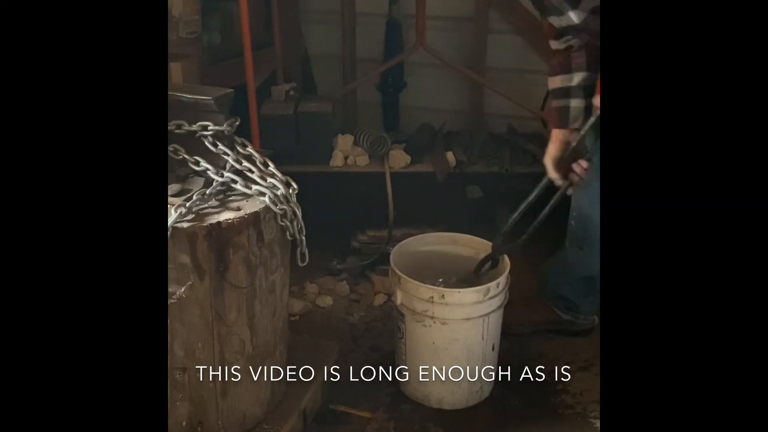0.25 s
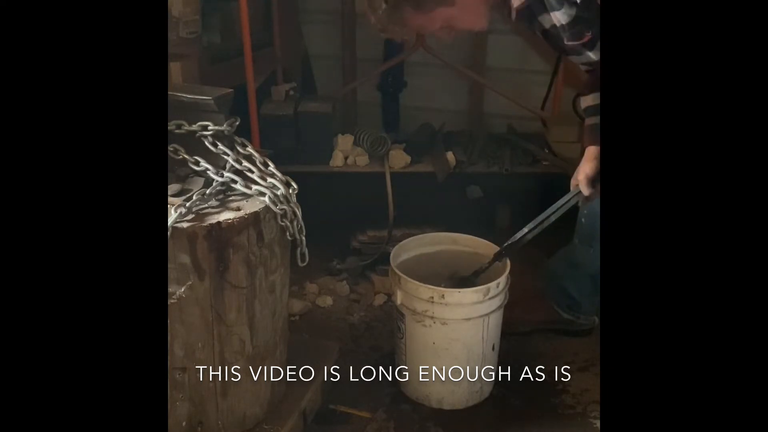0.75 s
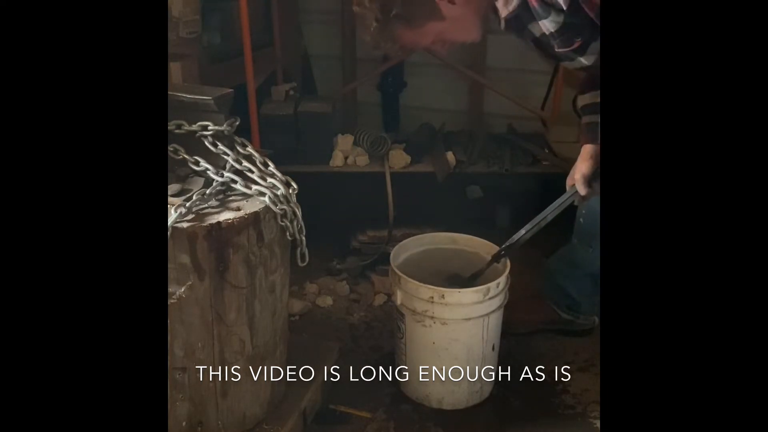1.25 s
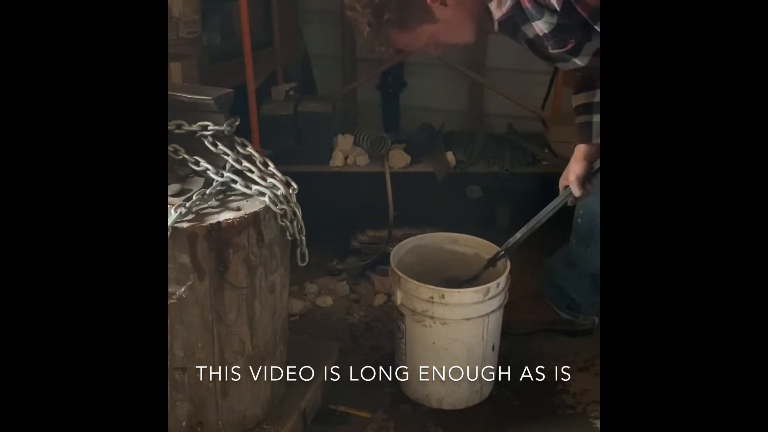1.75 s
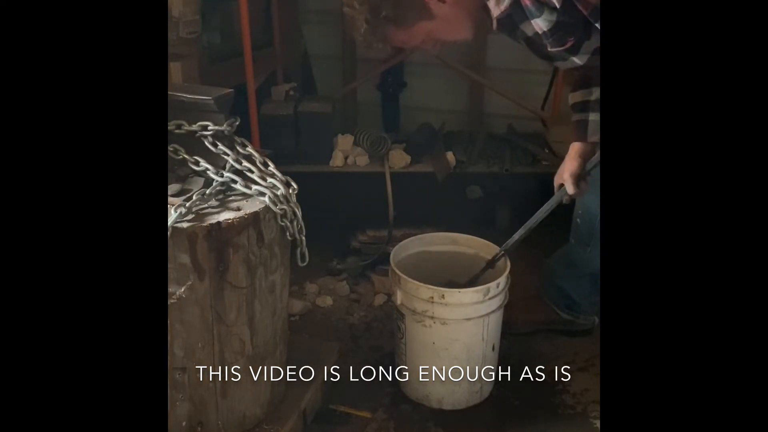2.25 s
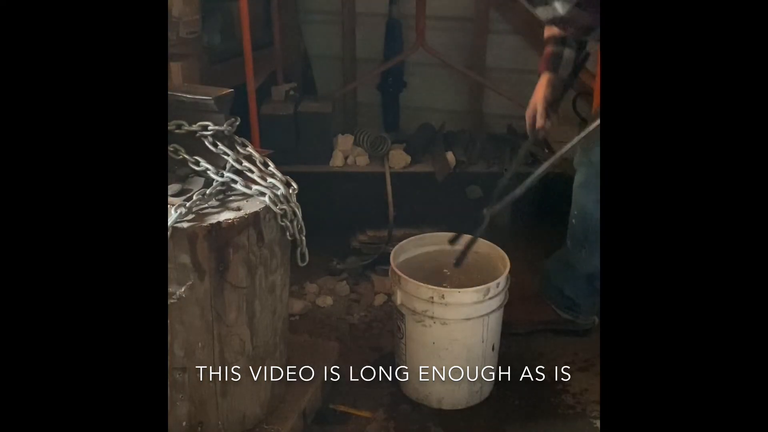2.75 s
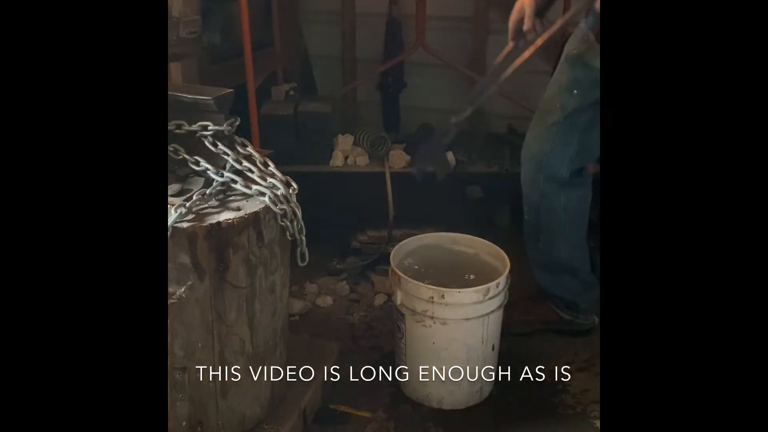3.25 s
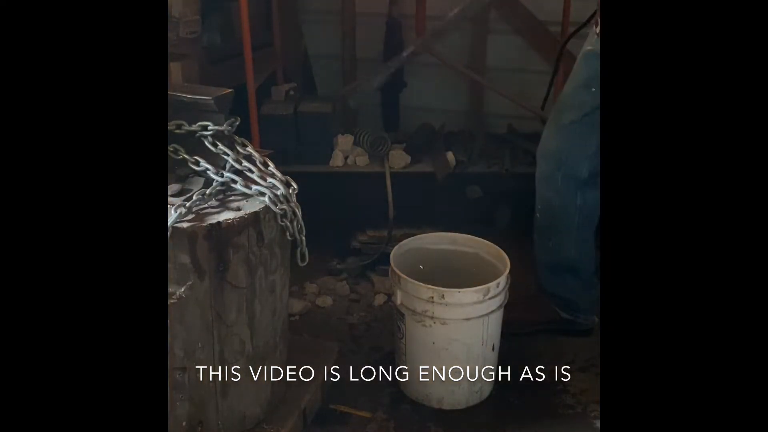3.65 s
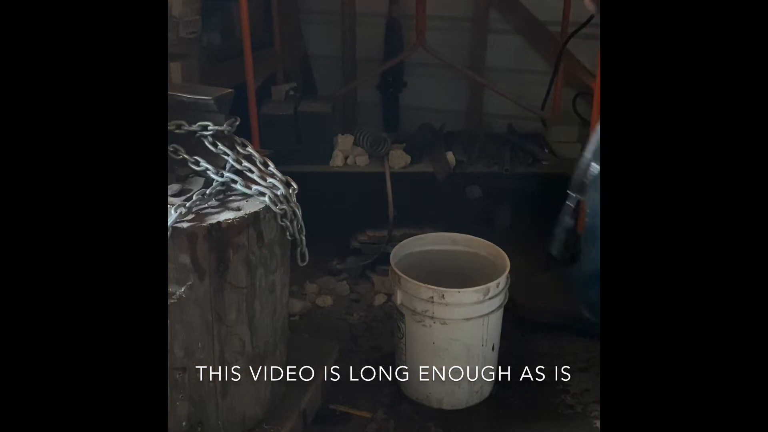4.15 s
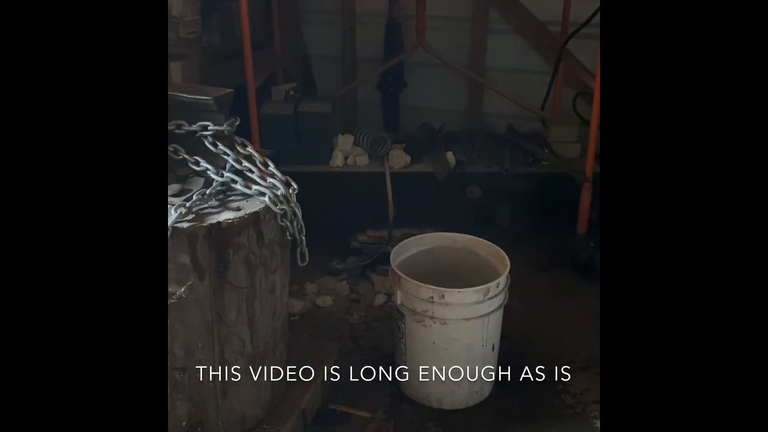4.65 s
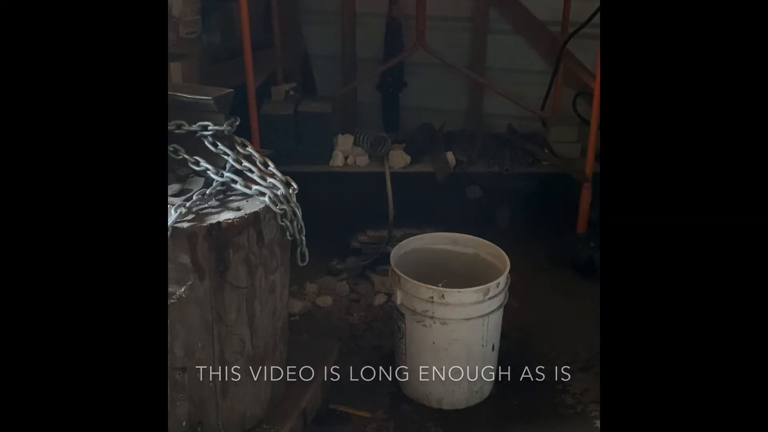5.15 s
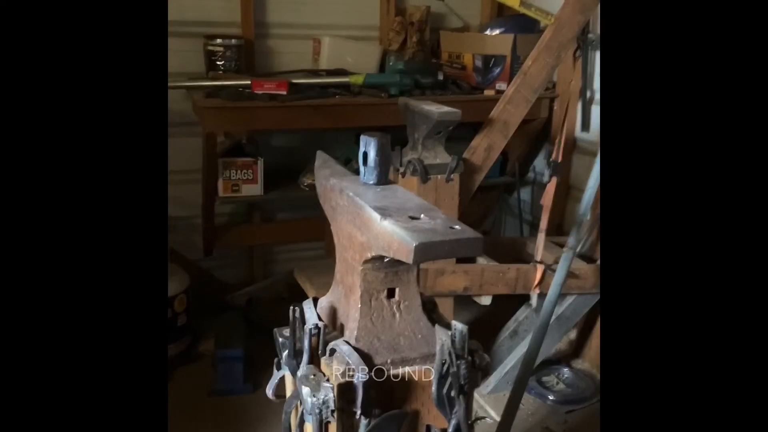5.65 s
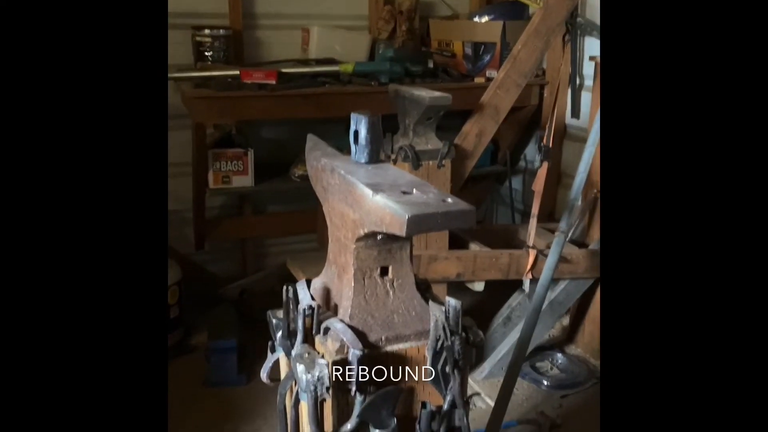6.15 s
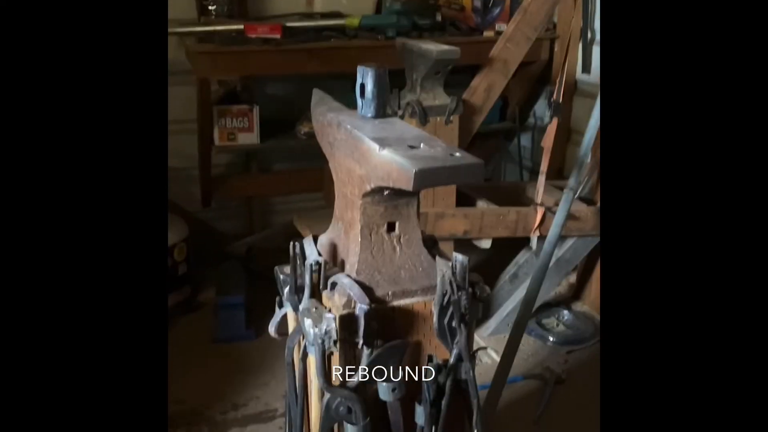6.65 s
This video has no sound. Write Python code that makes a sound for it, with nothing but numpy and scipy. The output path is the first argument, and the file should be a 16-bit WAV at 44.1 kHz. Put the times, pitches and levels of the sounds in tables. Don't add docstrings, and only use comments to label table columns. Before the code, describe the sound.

A steady, hollow burner roar fills a small shed with short echoes. An early light contact, then a loud plastic bucket knock, quick steel clatter, scrapes and wobbling slaps on boards. After a dull thud, a water drop fizzes on hot metal with a faint ring. The roar sags and stops; in sudden quiet, a hand shifts on the camera, bumping and clicking close to stereo microphones.

```python
import sys
import numpy as np
from scipy import signal
from scipy.fft import rfft, irfft
from scipy.io import wavfile
from scipy.ndimage import uniform_filter1d

SR = 44100
rng = np.random.default_rng(int(sys.argv[2]) if len(sys.argv) > 2 else 0)


def materialize(psi):
    bounded = np.clip(np.atleast_2d(psi).T, -1, 1)
    quanta = np.round(bounded * 32767).astype(np.int16)
    wavfile.write(sys.argv[1], SR, quanta)


def how_loud(loudness_db):
    steps = np.asarray(loudness_db, float) / 20
    return 10 ** steps


N = 303828

CHANGE_S = 5.436
KNOCK_S, KNOCK_DB = 2.6445, -7
SPIT_S = 3.661
PORT_DELAY_S = 7 / SR

# frequency in Hz, density in dB per Hz.
ROAR = [(36, -4), (80, -6), (150, -2.5), (230, -6), (450, -4), (720, -4.5), (850, -12.5), (1400, -16.5),
        (2700, -15.5), (3300, -20.5), (4300, -29), (5600, -30.5), (8000, -36.5), (16000, -36.5)]
# frequency in Hz, width in Hz, level in dB.
STANDING_WAVES = [(57, 15, 6), (152.7, 27, 4.8), (268.1, 24, 14.11), (305.3, 27, 6), (378.14, 9.5, 22.19),
                  (494.6, 7, 13.4), (633.4, 46, 14.45), (689, 14, 12), (784, 16, 2.6), (915, 52, 12.22),
                  (1023.3, 60, 13.57), (1320, 100, 6.6), (1800, 23, 6.3), (2140, 81, 7), (2830, 150, 5),
                  (4960, 360, 6.1), (9390, 780, 6.6), (11910, 700, 10), (15760, 400, 5)]
# start in seconds, peak in dB, ring frequency in Hz,
# broad crack in dB, crack t60 in seconds.
SHOP_TICKS = [(0.1426, -19.5, 1203, -6.5, 0.0134), (0.146, -26.5, 2010, -9.5, 0.0147),
              (2.6859, -19.5, 1480, 6, 0.0131), (2.7846, -40.5, 1430, -8, .02),
              (2.8255, -28, 1240, 5.5, 0.014), (2.862, -20, 1492, -1, 0.0233),
              (2.879, -22, 2064, -2.5, .02), (2.8889, -26, 2025, 2, .032), (2.905, -24.5, 2126, -6.5, .02),
              (2.9516, -20.5, 2015, 2, .02), (2.9845, -18.5, 2026, 4, 0.0177),
              (3.007, -28.5, 1804, 8.5, 0.018), (3.0697, -31.5, 1525, -1.5, .02),
              (3.0939, -22, 2185, 3, 0.025), (3.102, -27.5, 1730, -8, 0.0187), (3.133, -29.5, 1423, 1, .02),
              (3.143, -27, 1430, -1.5, 0.016), (3.61, -30, 2236, -3, 0.029), (3.618, -30, 2304, -6, 0.022)]
# start in seconds, scrape in dB, hiss in dB, t60 in seconds.
SKIDS = [(0.143, -30.5, -51.5, 0.248), (2.688, -29.5, -44.5, 0.32), (2.827, -31.5, -51, 0.114),
         (2.862, -30.5, -46, 0.28), (2.89, -43.5, -55, .2), (2.955, -38, -44, 0.147),
         (2.984, -30, -46, 0.18), (3.094, -28, -44.5, 0.17), (3.14, -36.5, -56.5, 0.314),
         (3.562, -46, -53.5, .15), (3.614, -54, -50.5, 0.15)]
# loudest moment in seconds, scrape in dB, hiss in dB,
# 60 dB rise in seconds, t60 in seconds.
BRUSH = [
    (2.478, -51, -48.5, 0.02, .25),
]
# loudest moment in seconds, level in dB,
# 60 dB rise in seconds, t60 in seconds.
ROCKS = [
    (.168, -33.5, 0.04, 0.246),
    (2.725, -35.5, -0.48, 0.89),
    (2.89, -32.5, 0.36, 0.36),
    (3.0, -35, 0.51, .5),
    (3.16, -35, 0.75, 0.186),
    (3.25, -43, 0.52, 0.83),
    (4.55, -36, 0.0155, 0.466),
    (4.71, -57.5, 0.3, 0.143),
]
# frequency in Hz, width in Hz, level in dB.
WALL_MODES = [(120, 11, 2.5), (180.3, 30, 0.5), (265.1, 25, -3), (392, 50, -10.5)]
# frequency in Hz, width in Hz, level in dB.
TONGS_MODES = [(641, 220, 1.5), (990, 330, -1), (1531, 180, -1), (2007, 190, -0.5), (2856, 440, -6.5)]
# frequency in Hz, density in dB per Hz.
GRIT_HISS = [(3000, -18.5), (4000, -3), (5000, 0), (6500, -3), (9000, -12.5), (12000, -15.5),
             (16000, -33.5)]
# start in seconds, peak in dB, frequency in Hz, rise in seconds, t60 in seconds.
SHOP_THUDS = [
    (.154, -26.5, 200.7, 0.0046, 0.118),
    (.158, -26.5, 109.8, 0.0049, 0.0475),
    (.21, -33, 85.6, 0.0095, 0.113),
    (3.5635, -21, 135, 0.0026, 0.18),
    (3.612, -23, 170, 0.00385, 0.037),
]
# start in seconds, peak in dB, frequency in Hz,
# rise in seconds, t60 in seconds.
SLAPS = [(2.672, -14, 300, 0.0039, .03), (2.702, -15.5, 289, 0.0042, .03),
         (2.872, -27.5, 270.7, 0.0064, .07), (2.902, -23.5, 127.7, 0.0055, .08),
         (2.905, -26, 197, 0.009, .07), (2.94, -27, 122, .01, .07), (2.988, -28.5, 121, 0.0062, 0.074),
         (2.992, -27, 255, .008, 0.051), (3.028, -25, 160, 0.0049, 0.045), (3.092, -31, 139.8, 0.0081, .08),
         (3.132, -27.5, 150.5, 0.0081, .06), (3.165, -28, 174.2, 0.011, .08), (3.17, -32, 105, 0.0114, .1),
         (3.27, -39, 144.5, 0.0125, 0.11)]
# frequency in Hz, t60 in seconds.
SHED_DECAY = [(60, 0.38), (200, 0.27), (600, 0.13), (2000, 0.2), (6000, 0.17), (16000, 0.032)]
# frequency in Hz, level in dB, t60 in seconds.
BUCKET_MODES = [(175.86, -3.5, 0.47), (277.6, 2.5, 0.078), (328.8, 4.5, 0.2105), (372.5, -8, 0.18),
                (663.9, -4.5, 0.22), (907, -14.5, 0.2), (1306, -18.5, 0.2), (1488, -10.5, 0.13),
                (1692, -24.5, 0.55), (1780, -22.5, 0.25), (1924, -21, .25), (2194, -23.5, 0.14),
                (2505, -34.5, 0.32), (2565, -39.5, 0.4),
                (120, -13.5, 0.55), (90, -13, 0.34), (731.8, -8.5, .22), (220, -18, 0.15),
                (430.6, -3.5, 0.16), (528.6, -7.5, 0.16), (594.8, -9.5, 0.12), (808.2, -9.5, 0.13),
                (1057, -13.5, 0.16)]
# frequency in Hz, density in dB per Hz.
STEAM_COLOUR = [(3000, -13), (4200, -3.5), (5000, -4), (7000, 0.5), (9300, -6.5), (10300, -9),
                (11000, -8.5), (13500, -8), (16000, -20.5)]
# frequency in Hz, level in dB, t60 in seconds.
BAR_MODES = [(4040, -54.5, .15), (4788, -46, .12), (5770, -55.5, .12), (6150, -52, .12), (9190, -44, .06),
             (10700, -48.5, .09), (11000, -49, .07)]
# moment in seconds, level in dB.
GRIP = [
    (5.44, -48),
    (5.64, -37.5),
    (5.738, -44.5),
    (5.992, -46.5),
    (6.282, -45),
    (6.402, -45),
    (6.654, -41.5),
    (6.782, -45.5),
    (6.89, -51),
]
# frequency in Hz, density in dB per Hz.
RUMBLE = [(15, -58.5), (25, -17.5), (48, -3.5), (119, -10), (237, -13), (259, -18), (517, -28), (900, -55),
          (1170, -99.5), (1980, -120)]
# frequency in Hz, density in dB per Hz.
RUSTLE = [(2500, -16.5), (3800, -3.5), (5000, -5), (6200, -5.5), (9000, -13), (11500, -30.5),
          (16000, -26.5)]
# loudest moment in seconds, #
# dull layer in dB, bright layer in dB, 60 dB rise in seconds, t60 in seconds.
SLIDES = [
    (5.612, -60.5, -70.5, -0.24, .3),
    (6.0, -100, -80, 1.35, 1.45),
    (6.2, -71.5, -85.5, 3.5, 0.11),
    (6.385, -68.5, -86.5, 0.2039, 0.35),
    (6.42, -66.5, -87, 0.13, .2),
    (6.458, -55, -74.5, 0.11, 0.2),
    (6.63, -58.5, -74, 0.0429, 0.45),
    (6.71, -64, -72.5, 0.35, 0.3),
]
# frequency in Hz, width in Hz, level in dB.
SHELL_MODES = [(520, 75.4, 1.5), (1480, 119.5, -1), (2466, 140, -4.5), (3046, 110, -11), (4540, 250, -13),
               (768, 140, 5), (1050, 138, 2.5)]
# start in seconds, peak in dB, ring frequency in Hz, broad crack in dB.
BODY_TICKS = [(5.5374, -50.5, 1490, -7), (5.5498, -37.5, 1450, -24.5), (5.5666, -38.5, 1430, -7.5),
              (5.5734, -25.5, 2664, -11.5), (5.5813, -38, 1320, -5), (5.5959, -42.5, 1550, 4),
              (5.6144, -41.5, 1420, 1.5), (6.2227, -33, 2343, -1), (6.2324, -40.5, 1300, 11),
              (6.2424, -45, 2600, 7), (6.327, -46.5, 1050, -4.5), (6.3405, -65.5, 1410, -12),
              (6.3882, -38, 1490, -8), (6.4024, -51.5, 1430, 0.5), (6.4213, -35.5, 1408, -5),
              (6.4474, -28.5, 1377, -7), (6.4527, -20, 2720, -4.5), (6.465, -24.5, 2554, -7.5),
              (6.4724, -36.5, 2490, 6), (6.4848, -52.5, 1350, -3.5), (6.6187, -49.5, 1960, -4),
              (6.7055, -49, 1770, -5.5)]
# start in seconds, peak in dB, frequency in Hz,
# rise in seconds, t60 in seconds.
BODY_THUMPS = [(5.553, -28, 130.7, .006, 0.075), (5.574, -21.5, 245, 0.00363, 0.0183),
               (5.576, -27, 520, 0.0027, 0.0795), (5.60, -37.5, 123, 0.005, 0.142),
               (5.82, -38.5, 120, 0.008, 0.12), (5.97, -42.5, 120, 0.011, 0.156),
               (6.224, -17.5, 240.9, 0.00208, 0.0264), (6.229, -14, 107.2, 0.00647, 0.068),
               (6.330, -46.5, 457, 0.00237, 0.026), (6.333, -36.5, 142.6, 0.006, 0.079),
               (6.422, -38, 407, 0.001985, 0.069), (6.459, -26, 455.4, 0.0053, 0.073),
               (6.462, -18.5, 90, 0.003, 0.1207), (6.525, -34, 170, 0.017, 0.052),
               (6.58, -41.5, 151.5, 0.0133, .15), (6.628, -32, 297, .004, 0.048),
               (6.636, -25.5, 179.2, 0.01, 0.1), (6.67, -30.5, 177.1, 0.0137, 0.047),
               (6.696, -23, 164.8, 0.0153, 0.104), (6.755, -37.5, 165.7, .014, 0.083),
               (6.785, -42, 393.5, .004, 0.043), (6.785, -29, 172.1, 0.0277, 0.041)]
# multiple of its frequency, level in dB.
BODY_PARTNERS = [(1.55, -19), (2.9, -28)]
# frequency in Hz, likeness from 0 to 1, lead of left in radians.
PORTS_SHOP = [(30, 1, 0), (80, .995, 0), (140, .97, -.15), (220, .93, -.3), (350, .82, -.5), (520, .5, -.6),
              (700, .25, 0), (900, .35, .6), (1700, .6, -.3), (2750, .87, .7), (4100, .65, 1.3),
              (4900, .5, .4), (5600, .8, .8), (6200, .85, 2.05), (7250, .96, 3.14)]
# frequency in Hz, likeness from 0 to 1, lead of left in radians.
PORTS_HAND = [(30, 1, 0), (80, .97, 0), (170, .85, 0), (450, .4, .8), (750, .4, 2.2), (1030, .6, 1.9),
              (1700, .7, 2.2), (2750, .88, 1.3), (3500, .3, 1), (5000, .25, 1.5), (6200, .85, 2.05),
              (7250, .95, 3.14)]
# frequency in Hz, left over right in dB.
PORT_TILT = [(60, 0.0), (150, -0.5), (380, -0.5), (950, 0.5), (2380, 0), (5980, -0.5), (15000, 0.0)]


def evened(x):
    return x / np.sqrt(np.mean(x ** 2) + 1e-20)


def read(points, hz, column=1):
    points = np.array(points)
    return np.interp(np.log(hz + 1), np.log(points[:, 0] + 1), points[:, column])


def level(rows, fade=0.01):
    rows, t = np.array(rows), np.arange(N) / SR
    edge = np.clip(np.minimum(t - rows[0, 0], rows[-1, 0] - t) / fade, 0, 1)
    return how_loud(np.interp(t, *rows.T)) * edge


def add(mix, s, sound):
    part = mix[round(s * SR):][:len(sound)]
    part += sound[:len(part)]


def peaks(modes, hz):
    return np.sqrt(sum(how_loud(db) ** 2 / (1 + (2 * (hz - f) / w) ** 2) for f, w, db in modes))


def noise(shape, size, patchy_db, flicker_db):
    frames, hz = 4 * N // size + 5, np.fft.rfftfreq(size, 1 / SR)
    a, b, c, d, patches = rng.standard_normal((frames, len(hz), 5)).T
    patches = uniform_filter1d(patches, size=size // 100, axis=0)
    patches = evened(uniform_filter1d(patches, size=8, axis=1))
    flicker = evened(uniform_filter1d(rng.standard_normal(frames), size=3))
    drift = how_loud(patchy_db * patches + flicker_db * flicker)
    z = np.array([a + 1j * b, c + 1j * d]) * shape(hz)[:, None] * drift
    return evened(signal.istft(z, nperseg=size, noverlap=3 * size // 4)[1][:, :N])


def strokes(rows):
    out = np.zeros(N)
    for s, db, rise, t60 in rows:
        t = np.arange(-min(rise, s), t60, 1 / SR)
        add(out, s + t[0], how_loud(db - 60 * np.maximum(-t / rise, t / t60)))
    return out


def layered(rows, dull, bright):
    rows = np.array(rows)
    return dull * strokes(rows[:, [0, 1, 3, 4]]) + bright * strokes(rows[:, [0, 2, 3, 4]])


def burner():
    ripple = evened(uniform_filter1d(rng.standard_normal(2049), size=3))

    def colour(hz):
        ripple_db = 3.22 * ripple * np.clip(hz / 1100, 0, 1)
        return how_loud(read(ROAR, hz) + ripple_db) * np.hypot(1, peaks(STANDING_WAVES, hz))

    t = np.arange(N) / SR
    fade = np.clip((CHANGE_S - t) / 0.0336, 0, 1)
    sag_db = 8.5 * np.maximum(t - 5.13, 0)
    return noise(colour, size=4096, patchy_db=.5, flicker_db=.15) * how_loud(-38 - sag_db) * fade


def ticks(rows, width, body, body_db, dull):
    out, t = np.zeros(N), np.arange(2000) / SR
    rise = np.sin(np.pi / 2 * np.minimum(t / .0025, 1)) ** 2
    for (s, db, hz, crack_db, t60), grit in zip(rows, rng.standard_normal((len(rows), len(t)))):
        spot_db = 3 * grit
        modes = [(hz, width, 0)]
        modes += [(f, w, mode_db + body_db + g) for (f, w, mode_db), g in zip(body, spot_db)]
        ring = sum(np.sin(2 * np.pi * f * t) * np.exp(-np.pi * w * t) * how_loud(g_db) for f, w, g_db in modes)
        crack = signal.lfilter([1, -1], [1, -.75], grit) * how_loud(crack_db - 60 * t / t60)
        crack = signal.lfilter([(1 - dull) ** 2], [1, -2 * dull, dull ** 2], crack)
        add(out, s, how_loud(db) * (ring * rise + crack))
    return out


def drags():
    wall = noise(lambda hz: peaks(WALL_MODES, hz) ** 2, size=1024, patchy_db=-0.5, flicker_db=1.5)
    tongs = noise(lambda hz: peaks(TONGS_MODES, hz) ** 2, size=256, patchy_db=1.0, flicker_db=0.5)
    grit = noise(lambda hz: how_loud(read(GRIT_HISS, hz)), size=256, patchy_db=5.0, flicker_db=4.0)
    rise_s = 0.019
    skids = [(s, scrape_db, hiss_db, rise_s, t60) for s, scrape_db, hiss_db, t60 in SKIDS]
    return wall * strokes(ROCKS) + layered(skids + BRUSH, tongs, grit)


def thuds(rows, partners, sag):
    out, t = np.zeros(N), np.arange(SR // 2) / SR
    modes = [(0.9968, 0.0017)] + partners  # (multiple, dB)
    for s, db, hz, rise, t60 in rows:
        shape = np.sin(np.pi / 2 * np.minimum(t / rise, 1)) ** 2
        shape *= how_loud(db - 60 * (np.maximum(t - rise, 0) / t60) ** 0.99)
        turns = np.cumsum(hz * (1 + sag * np.exp(-t / 0.0066))) / SR
        add(out, s, shape * sum(how_loud(g_db) * np.sin(2 * np.pi * k * turns) for k, g_db in modes))
    return out


def shed(x):
    taps = np.zeros((2, SR))
    at = np.arange(200, SR - 20, 20) + rng.integers(0, 20, (2, (SR - 201) // 20))
    np.put_along_axis(taps, at, rng.choice([-1., 1.], at.shape), 1)
    hz, t, z = signal.stft(taps, SR, nperseg=512)
    decay = how_loud(-60 * t / read(SHED_DECAY, hz)[:, None])
    tail = signal.istft(z * decay, SR, nperseg=512)[1]
    return signal.fftconvolve(x[None], tail / np.linalg.norm(tail[0]), axes=1)[:, :N]


def knock():
    t = np.arange(SR) / SR
    out = ticks([(KNOCK_S, -14, 5100, 0, .03)], 500, TONGS_MODES, body_db=-12.0, dull=.48)
    modes = BUCKET_MODES
    for (hz, db, t60), chance in zip(modes, rng.random((len(modes), 2))):
        late = np.maximum(t - .085 / np.sqrt(hz), 0)
        twin_hz, twin_gain = hz * (1.05 + 0.06 * chance[0]), 0.32 + .5 * chance[1]
        pair = np.sin(2 * np.pi * hz * late) + twin_gain * np.sin(2 * np.pi * twin_hz * late)
        early_push = 1 + 1.4 * np.exp(-late / 0.026)
        decay = how_loud(KNOCK_DB - 12.5 + db - 60 * late / t60)
        add(out, KNOCK_S, pair * early_push * np.minimum(late * hz * 2.0, 1) * decay)
    sweep_hz = 300 + 2300 * np.exp(-(t / .0055) ** 2.2)
    sweep = np.sin(2 * np.pi * np.cumsum(sweep_hz) / SR) * how_loud(-14.0 - 60 * t / 0.073)
    out = out + thuds([(KNOCK_S + 0.005, -13, 124, .01, .07)], [], sag=.2)
    add(out, KNOCK_S, sweep * np.minimum(t / 0.0017, 1))
    return signal.sosfilt(signal.butter(N=4, Wn=75, btype="high", fs=SR, output="sos"), out)


def spit():
    steam = noise(lambda hz: how_loud(read(STEAM_COLOUR, hz)), size=256, patchy_db=3.5, flicker_db=-1.0)
    burst = steam * strokes([(SPIT_S, -33.5, .002, 0.052), (SPIT_S, -40, .002, 0.267)])
    ring = thuds([(SPIT_S, db, hz, .002, t60) for hz, db, t60 in BAR_MODES], [(1.012, -5)], sag=0)
    return burst + ring + how_loud(-3) * shed(ring)


def hand():
    rumble_colour = RUMBLE + [(1500, -84.5)]
    rumble = noise(lambda hz: how_loud(read(rumble_colour, hz)), size=1024, patchy_db=3.0, flicker_db=2.5)
    skin_modes = SHELL_MODES[1:4] + [(900, 870, -3.5), (1950, 500, -11)]
    dull = noise(lambda hz: (hz > 600) * peaks(skin_modes, hz), size=512, patchy_db=4.5, flicker_db=0.5)
    bright = noise(lambda hz: how_loud(read(RUSTLE, hz)), size=512, patchy_db=4.5, flicker_db=-2.0)
    rustle = how_loud(6.5) * layered(SLIDES, dull, bright)
    crack_t60 = 0.01196
    hits = ticks([(*row, crack_t60) for row in BODY_TICKS], 184.5, SHELL_MODES, body_db=-2.5, dull=0.53)
    hits = hits + thuds(BODY_THUMPS, BODY_PARTNERS, sag=.3)
    through_shell = np.array([hits, how_loud(-6.5) * np.roll(hits, shift=25)])
    echo = how_loud(-24) * shed(signal.lfilter([1, -1], [1, -.93], hits))
    air = noise(lambda hz: (hz > 600) / (1 + (hz / 3000) ** 2), size=512, patchy_db=3.5, flicker_db=-2.0)
    air = air * how_loud(-79) * np.clip((np.arange(N) / SR - CHANGE_S) / 0.12, 0, 1)
    return rumble * level(GRIP) + air + rustle + through_shell + echo


def scene():
    hits = ticks(SHOP_TICKS, 120, TONGS_MODES, body_db=-11.5, dull=0.6814)
    hits = hits + thuds(SHOP_THUDS, [(1.4, -7.5), (2.1, -11.5)], sag=0.1)
    hits = hits + thuds(SLAPS, [(1.5, -11.5)], sag=0.13) + knock()
    direct = hits * how_loud([[0], [-2]])
    return burner() + drags() + spit() + direct + how_loud(-6.5) * shed(hits) + hand()


def ports(x, table):
    hz = np.fft.rfftfreq(N, 1 / SR)
    same = np.clip(read(table, hz), 0, 1)
    lead = read(table, hz, column=2)
    lead = lead + 2 * np.pi * PORT_DELAY_S * np.maximum(hz - table[-1][0], 0)
    a, b = rfft(x, axis=1)
    tilt = how_loud(read(PORT_TILT, hz) / 2)
    right = same * np.exp(-1j * lead) * a + np.sqrt(1 - same ** 2) * b
    return irfft([a * tilt, right / tilt], N, axis=1)


def band_limit(x):
    return signal.sosfilt(signal.butter(12, 16650, fs=SR, output="sos"), x)


def record(dry):
    before = np.arange(N) < CHANGE_S * SR
    x = ports(dry * before, PORTS_SHOP) + ports(dry * ~before, PORTS_HAND)
    x = signal.sosfilt(signal.butter(4, 40, "high", fs=SR, output="sos"), x)
    x = signal.oaconvolve(x, signal.firwin(255, 15950, fs=SR)[None], "same")
    return band_limit(x)


dry = scene()
out = record(dry)
materialize(out)
```